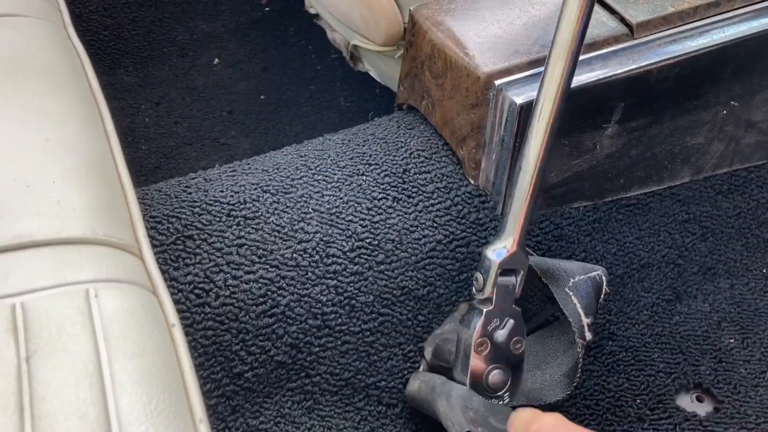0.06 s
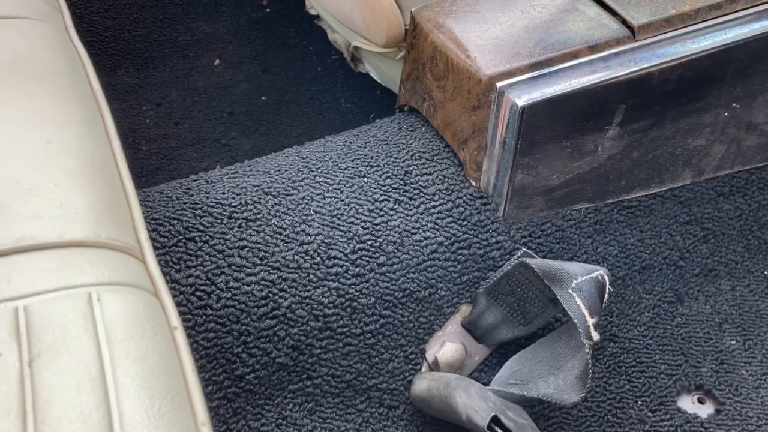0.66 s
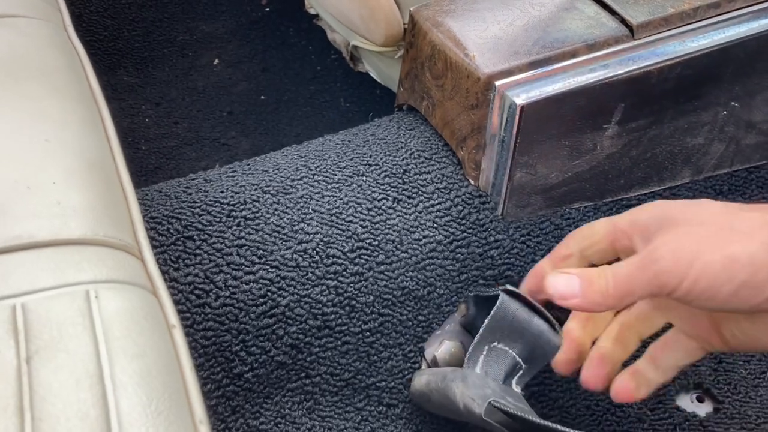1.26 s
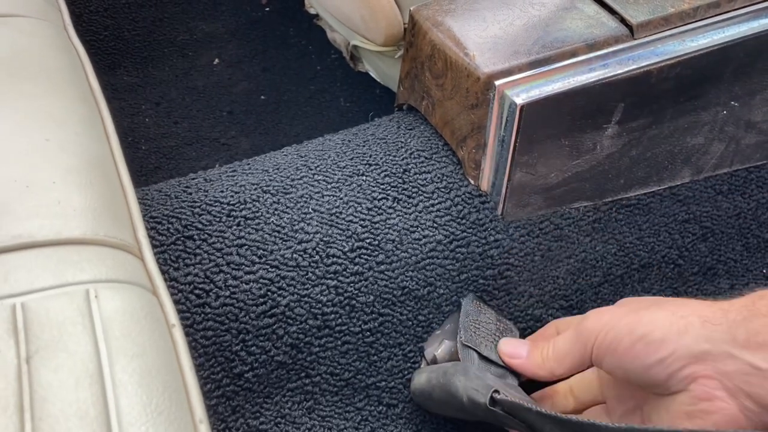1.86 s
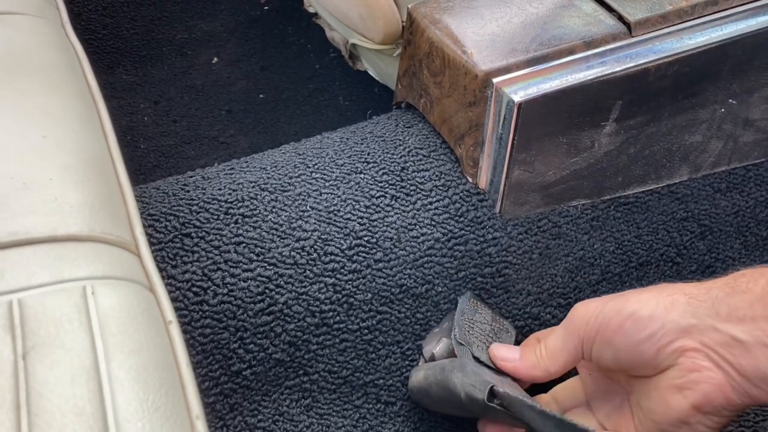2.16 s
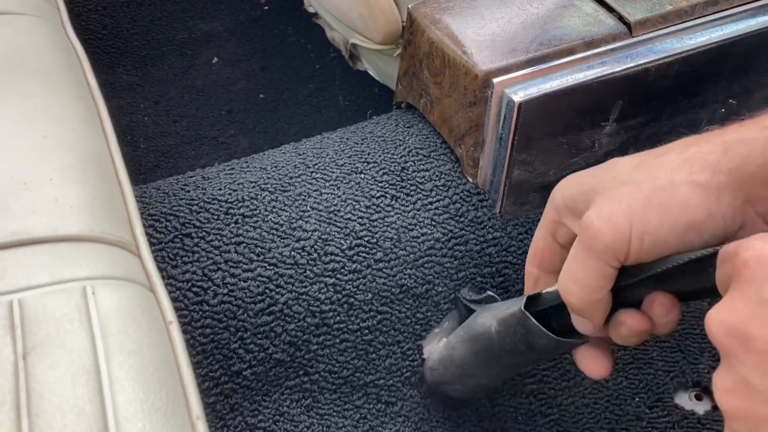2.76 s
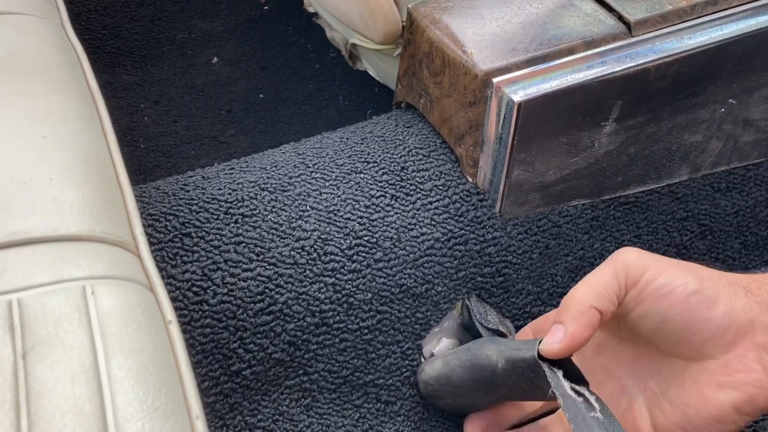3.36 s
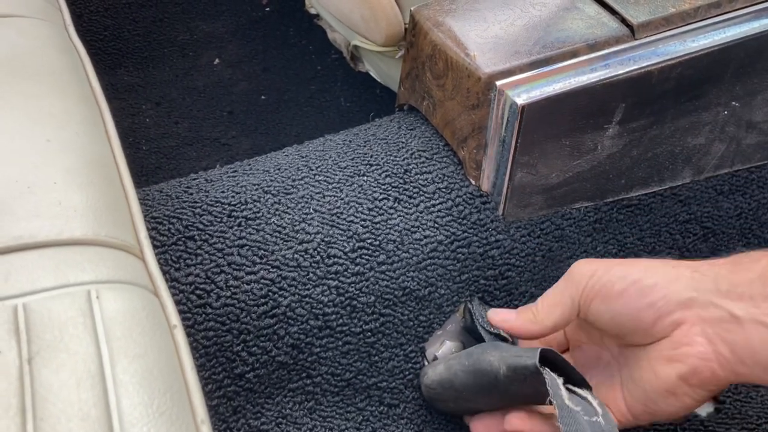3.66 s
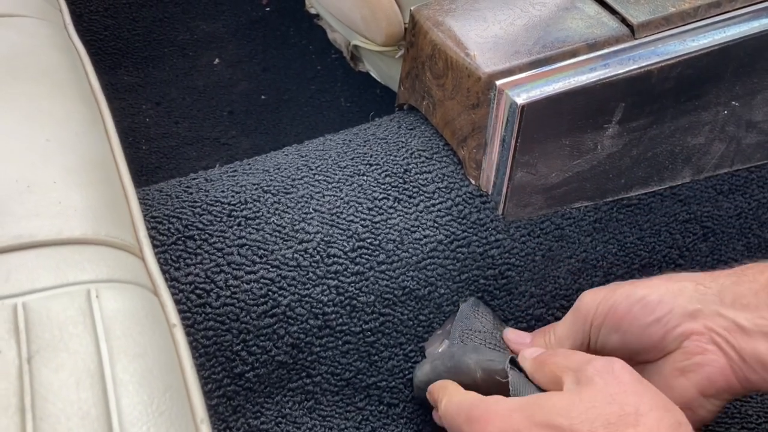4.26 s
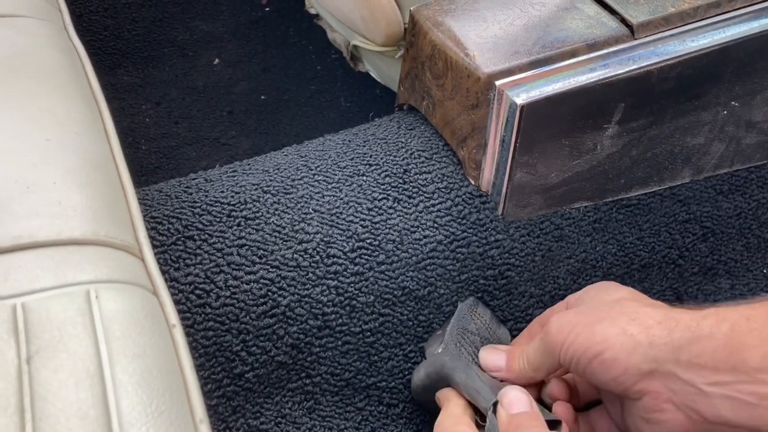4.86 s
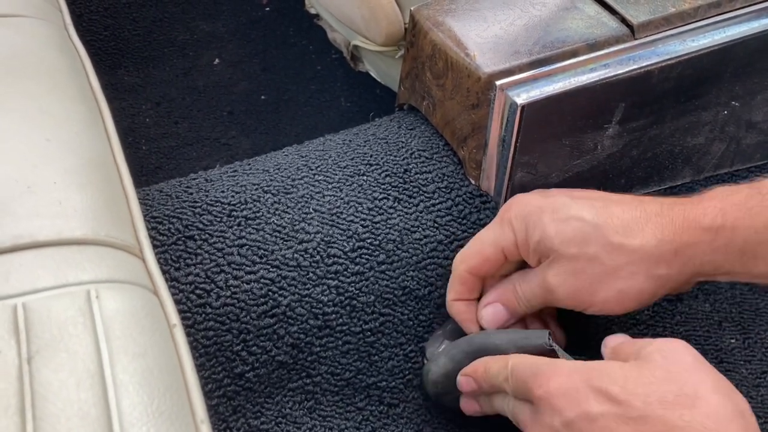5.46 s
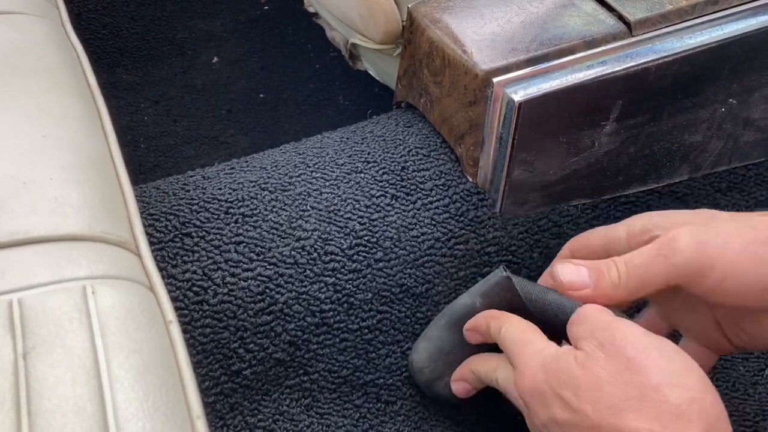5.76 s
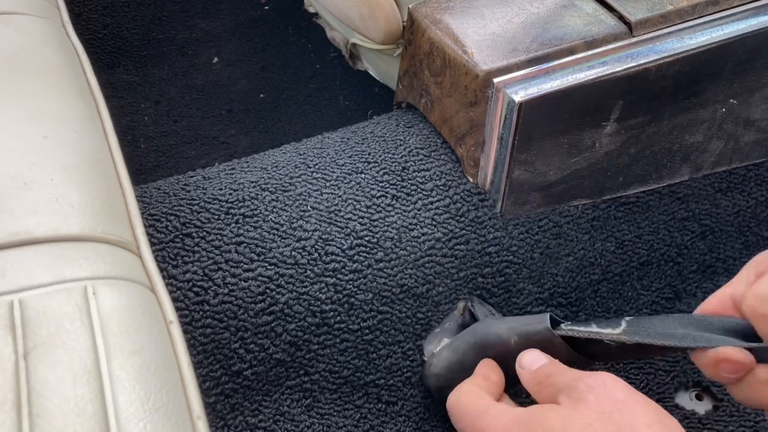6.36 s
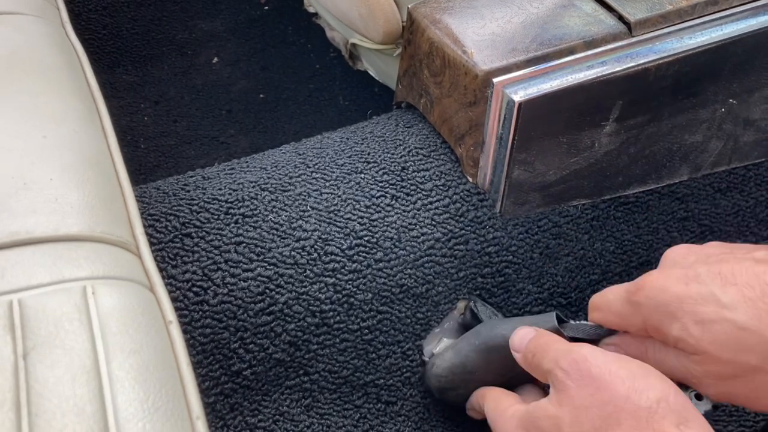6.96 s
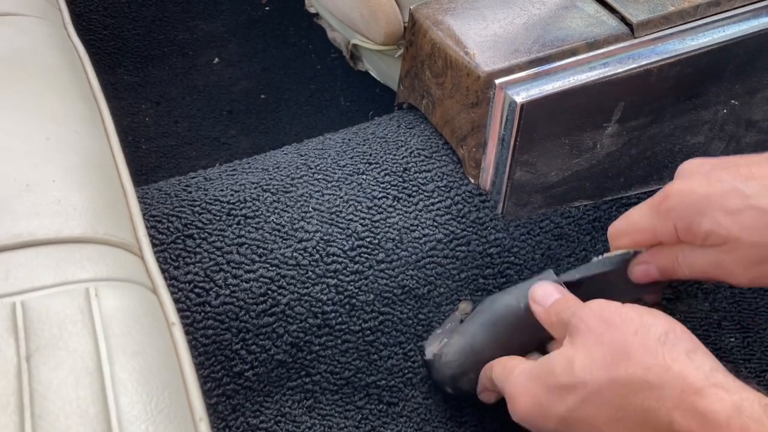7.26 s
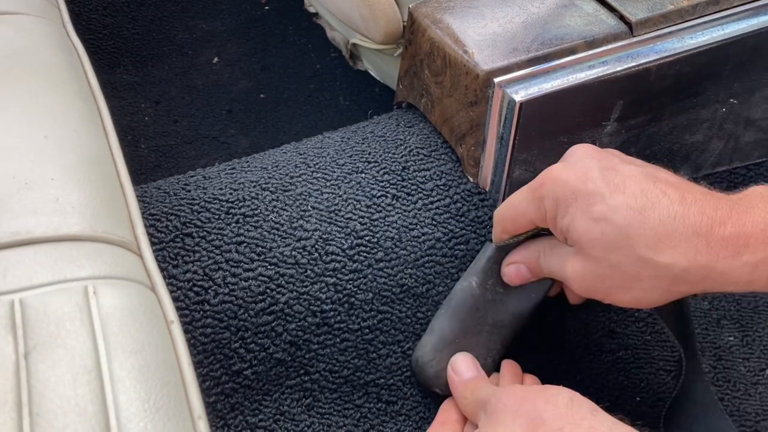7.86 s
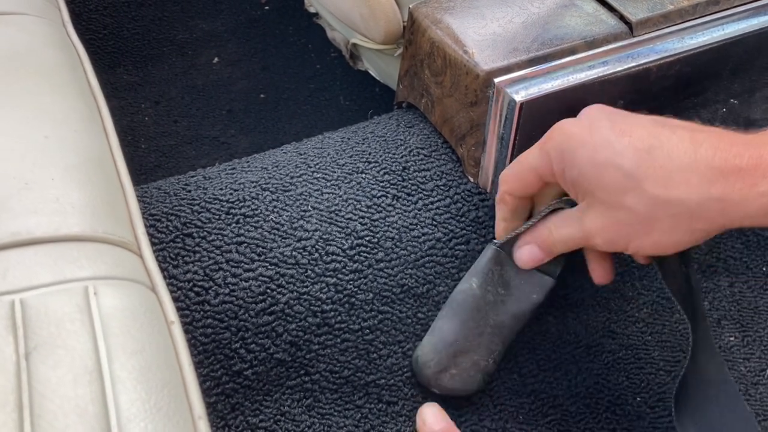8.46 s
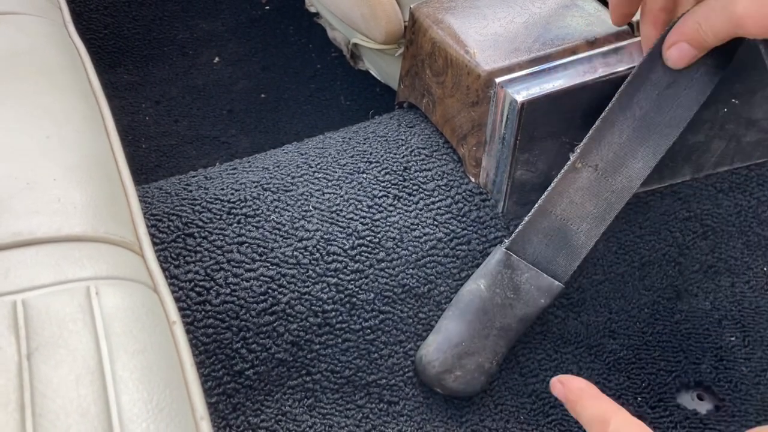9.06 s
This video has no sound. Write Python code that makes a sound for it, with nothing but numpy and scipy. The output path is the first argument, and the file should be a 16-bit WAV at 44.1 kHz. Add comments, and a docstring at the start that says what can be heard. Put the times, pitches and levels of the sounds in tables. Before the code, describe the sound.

Close up inside an open, parked car, steel rattles and knocks over a low boom from the floor, then clicks and thumps again about a second later. A long stretch of uneven scratchy rubbing follows as seat belt webbing slips through a stiff vinyl sleeve, dotted with light knocks. A louder cluster of knocks and thumps comes late, then more sliding. A soft outdoor rumble lies underneath.

```python
"""A steel seat belt anchor plate flops over and thumps the carpeted floor pan of an open, parked car
as a ratchet is lifted off its bolt. The pan booms in low modes; the steel knocks, ticks and pings.
Hands work a vinyl boot down the webbing, rubbing in grains of stick and slip, until the plate knocks
home inside it. Short cabin reflections surround it; faint outdoor air and far insects lie underneath."""
import sys
import numpy as np
from scipy import signal
from scipy.fft import rfft, irfft, next_fast_len
from scipy.io import wavfile

SR = 44100
rng = np.random.default_rng(int(sys.argv[2]) if len(sys.argv) > 2 else 0)


def digitize_waveform(pressure):
    """Quantize a signal to 16-bit integers and store it at the path in sys.argv[1].

    Rows of a 2-D input are taken as channels; values are limited to [-1, 1].
    """
    field = np.atleast_2d(pressure).T
    bounded = np.clip(field, -1, 1)
    quanta = np.round(bounded * 32767).astype(np.int16)
    wavfile.write(sys.argv[1], SR, quanta)


N = 401751
T = np.arange(N) / SR
# bright snap of metal edges and stiff vinyl: f/Hz, level/dB
SNAP_EQ = [(400, -2.5), (1200, 4.5), (4000, 2.5), (5500, -2), (8000, 11), (12000, 7.5), (16000, 5)]


def undb(db):
    """Decibels to gain."""
    return 10 ** (np.asarray(db) / 20)


def unit(x):
    """Scale to rms 1."""
    return x / np.sqrt(np.mean(x ** 2))


def add(track, s, sound, db):
    """Mix a sound in at time s with the given peak level."""
    i = max(int(s * SR), 0)
    track[i:i + len(sound)] += (undb(db) * sound / np.abs(sound).max())[:N - i]


def colour(x, points, tilt_db=0):
    """Minimum-phase EQ through (f/Hz, level/dB) points, tilted by tilt_db an octave."""
    size = next_fast_len(len(x) + 4096)
    size += size % 2
    octave = np.log2(np.maximum(np.fft.rfftfreq(size, 1 / SR), 1))
    hz, db = np.transpose(points)
    gain = undb(np.interp(octave, np.log2(hz), db + tilt_db * np.log2(hz / hz[0])))
    cepstrum = irfft(np.log(gain))
    cepstrum[1:size // 2] *= 2  # fold forward, so nothing rings ahead of an attack
    cepstrum[size // 2 + 1:] = 0
    return irfft(rfft(x, size) * np.exp(rfft(cepstrum)))[:len(x)]


def resonate(x, hz, width):
    """One resonance, gain 1 at its centre."""
    return signal.lfilter(*signal.iirpeak(hz, hz / width, fs=SR), x)


def decay(t, t60):
    """Envelope that falls 60 dB in t60 seconds."""
    return np.exp(-np.log(1000) * t / t60)


def walk(rate):
    """Random drift, gliding to a new value rate times a second."""
    return np.interp(T * rate, np.arange(N), rng.standard_normal(N))


def grains(rate, spread_db):
    """Tiny slips at random moments, a few far stronger than the rest."""
    slips = (rng.random(N) < rate / SR) * rng.standard_normal(N)
    strength_db = spread_db * np.minimum(rng.exponential(size=N), 4)
    return unit(slips * undb(strength_db))


def gestures(table, swell_share=0.28, sag_db=1.5, fade_s=0.013, fade_share=0.15):
    """One envelope per level column: each move swells, sags and fades, long ones more slowly."""
    power, t = np.zeros((len(table[0]) - 2, N)), T[:SR]
    for start, length, *levels_db in table:
        swell = np.sin(np.pi / 2 * np.minimum(t / (swell_share * length), 1))
        fade = np.exp(-np.maximum(t - length, 0) / (fade_s + fade_share * length))
        shape = swell * undb(-sag_db * np.minimum(t / length, 1)) * fade
        i = max(int(start * SR), 0)
        power[:, i:i + len(t)] += np.outer(undb(levels_db), shape[:N - i]) ** 2
    return np.sqrt(power)


def outdoors(air_db=-49, balance_db=-0.4, insect_hz=4200):
    """The bed: distant rumble in the centre, wide hiss and a thin band of insects."""
    # outdoor air: f/Hz, level/dB
    air_eq = [(20, -15), (42, 3), (70, 2), (105, 1.5), (135, -6), (200, -6), (300, -21), (600, -27),
              (1300, -33), (2000, -37.5), (4300, -52), (6000, -48.5), (12000, -62), (16000, -60)]
    # far insect calls: t/s, length/s, level/dB
    calls = [(.17, 0.26, -64.5), (.55, 0.42, -72.5)]
    mid, side = (colour(rng.standard_normal(N), air_eq) for _ in range(2))
    side = colour(side, [(80, -17.0), (200, -12.5), (600, 2.0), (2000, 4.5)])
    air = np.array([(mid + side) * undb(balance_db), (mid - side) / undb(balance_db)]) / mid.std()
    insects = resonate(rng.standard_normal((2, N)), insect_hz, width=800)
    insects = unit(resonate(insects, insect_hz, width=800))
    swell_db = 1.6 * walk(rate=3)
    return air * undb(air_db + swell_db) + insects * gestures(calls)[0]


def reflected(x):
    """Seats and console throw back the middle range; the bass bends round them."""
    # tone of the reflections: f/Hz, level/dB
    cabin_eq = [(300, -3.5), (550, 1.5), (1100, -6), (2200, -1.5), (5500, 6), (7000, -22), (16000, -51)]
    return signal.sosfilt(signal.butter(2, 230, "high", fs=SR, output="sos"), colour(x, cabin_eq))


def cabin(x, t60=0.038, gap_s=0.0012, wet_db=-2):
    """The cabin returns a short spray of reflections, different left and right."""
    t = T[:SR // 5]
    sprays = rng.standard_normal((2, len(t))) * decay(t, t60) * (t > gap_s)
    responses = [reflected(spray / np.linalg.norm(spray)) for spray in sprays]
    return undb(wet_db) * np.array([signal.fftconvolve(x, response)[:N] for response in responses])


def mic_ports(x):
    """Direct sound reaches the two mic ports nearly in step in the bass, out of step in the treble."""
    # lead of left over right: f/Hz, phase/rad
    lead = [(0, 0), (180, -.2), (300, -.8), (400, 0), (7300, -.1), (9200, -3.14), (11500, -6.28),
            (13600, -9.42), (15400, -12.5), (22050, -12.6)]
    # balance of left over right: f/Hz, level/dB
    balance = [(70, -1), (200, -4), (900, 0.5), (2200, 2.5), (4500, 0.5), (12000, -0.5)]
    hz = np.fft.rfftfreq(N, 1 / SR)
    phase = np.interp(hz, *np.transpose(lead))
    balance_db = np.interp(hz, *np.transpose(balance))
    pan = np.exp(0.5j * phase) * undb(balance_db / 2)
    return np.array([irfft(rfft(x) * pan, N), irfft(rfft(x) / pan, N)])


def hand_echo(x, lag_s):
    """A moving hand reflects some of the rubbing: a drifting comb filter."""
    return 0.9 * x + 0.45 * np.interp(T - lag_s, T, x)


def webbing(slide, press, catch_db=1.5):
    """Threads slip over the vinyl in dense grains; the belt catches unevenly and the boot crinkles."""
    # hiss of the weave: f/Hz, level/dB
    weave_eq = [(2500, -29.5), (4500, -25), (6000, -5.5), (8400, -1.5), (11500, -0.5), (14000, -7),
                (16000, -8)]
    # rasp of pressed vinyl: f/Hz, level/dB
    rasp_eq = [(900, -12.5), (1900, -2.5), (3000, -6), (4200, -2), (5500, -15), (9000, -14.5)]
    hiss = unit(colour(grains(rate=14000, spread_db=1.5), weave_eq)) * slide
    rasp = unit(colour(grains(rate=2200, spread_db=2.4), rasp_eq)) * press
    crinkle = unit(colour(grains(rate=120, spread_db=2), SNAP_EQ, tilt_db=-2)) * press * undb(-3)
    return (hiss + rasp) * undb(catch_db * walk(rate=54)) + crinkle


def scuffing(grip, jerk_db=2):
    """Coarser stick and slip scuffs the hollow boot."""
    # body of the boot: f/Hz, level/dB
    boot_eq = [(200, 8), (430, 7), (570, 0.5), (780, 7.5), (1000, 6.5), (1400, 9), (1800, -5.5),
               (3500, -37.5)]
    scuff = unit(colour(grains(rate=2000, spread_db=3.0), boot_eq))
    return scuff * grip * undb(jerk_db * walk(rate=45))


def scrapes(width_share=0.42):
    """Each rub swells and fades in a broad resonance set by how the boot is held."""
    # rubs on the squeezed boot: middle t/s, spread/s, resonance f/Hz, level/dB
    rubs = [(2.74, 0.039, 1920, -67), (2.91, .027, 1800, -67.5), (3.72, 0.02, 950, -54),
            (3.785, 0.019, 1000, -54), (3.915, 0.024, 2300, -53), (4.04, .036, 4000, -62),
            (4.53, 0.022, 1160, -55), (4.83, 0.045, 2360, -62.5), (4.84, 0.026, 830, -78),
            (5.049, 0.016, 627, -57), (5.22, 0.017, 1000, -57.5), (5.338, 0.0058, 2120, -59),
            (6.49, 0.02, 2070, -64), (6.5, .017, 1280, -56.5), (7.78, 0.08, 925, -61),
            (8.54, 0.054, 4100, -56.5)]
    out, slips = np.zeros(N), grains(rate=1100, spread_db=2.4)
    for s, spread_s, hz, db in rubs:
        near = np.abs(T - s) < 4 * spread_s
        hollow = resonate(resonate(slips[near], hz, width_share * hz), hz, width_share * hz)
        swell = np.exp(-0.5 * ((T[near] - s) / spread_s) ** 2)
        out[near] += unit(hollow) * swell * undb(db)
    return out


def rubbing(resting_db=(-74.5, -78.5, -73)):
    """Hands rub all along the belt, so the direct sound and both reflections get their own grains."""
    # hand strokes: t/s, length/s, weave hiss level/dB, vinyl rasp level/dB, boot scuff level/dB
    strokes = [(0.026, 0.021, -53, -53.5, -35), (0.078, 0.036, -65.0, -50.5, -36.5),
               (0.494, 0.081, -59.5, -61.5, -57), (0.6, 0.26, -67.5, -72.5, -91),
               (0.85, 0.35, -55.5, -60.0, -58.5), (1.04, 0.04, -52.5, -48.0, -44.5),
               (1.063, 0.19, -54.5, -56.5, -59.5), (1.288, 0.17, -54.5, -58, -50),
               (1.473, 0.18, -60, -66.5, -59), (1.674, 0.057, -61, -74, -62),
               (1.991, 0.27, -69.5, -82, -80), (2.225, 0.093, -59.5, -66.5, -59),
               (2.38, 0.19, -63.5, -70.5, -57), (2.659, 0.106, -63.5, -67.5, -55),
               (2.726, 0.12, -61.5, -69.5, -103.5), (2.86, 0.11, -54.5, -65, -66),
               (3.033, 0.09, -56.5, -63, -54.5), (3.171, 0.18, -59.5, -64.5, -62),
               (3.519, 0.028, -64.0, -58.5, -56), (3.751, 0.15, -62, -63.5, -57),
               (3.892, 0.045, -46.5, -52.5, -49), (3.924, 0.25, -59.0, -66, -60),
               (4.185, 0.165, -66.5, -67.5, -59), (4.481, 0.16, -61, -65, -57.5),
               (4.759, 0.12, -64.5, -66, -56.5), (5.011, 0.033, -59.0, -65.5, -60),
               (5.18, 0.044, -59.5, -61.0, -55), (5.255, 0.088, -64.0, -67, -58.5),
               (5.38, 0.041, -59, -60, -51), (5.538, 0.15, -58, -64.5, -60.5),
               (5.785, 0.2, -63.5, -83, -62.0), (5.873, 0.075, -68, -63.5, -51),
               (5.925, 0.077, -52, -59.5, -50.5), (6.063, 0.16, -58, -67.0, -69),
               (6.196, 0.17, -57, -60.0, -59), (6.271, 0.039, -49, -47.5, -51.5),
               (6.432, 0.13, -57.5, -71, -58), (6.509, 0.059, -51.5, -64, -68),
               (6.622, 0.039, -57, -69, -75), (6.828, 0.15, -59.5, -65, -64), (6.915, 0.041, -67, -60, -51),
               (7.002, 0.19, -70.5, -75.5, -66.5), (7.205, 0.12, -52.5, -56, -48.5),
               (7.329, 0.13, -63.0, -70, -58.5), (7.533, 0.11, -57.5, -70.5, -62),
               (7.669, 0.1, -60.5, -69, -67.0), (7.834, 0.25, -64, -70, -60),
               (8.144, 0.133, -64, -68.5, -58.5), (8.36, 0.16, -64, -68.5, -61.5),
               (8.425, 0.18, -49.5, -63, -59.5), (8.57, 0.31, -56.0, -60.5, -59),
               (8.955, 0.051, -64.0, -71, -54.5)]
    # resting hands keep all three layers faintly alive between strokes
    slide, press, grip = np.hypot(gestures(strokes), undb(resting_db)[:, None])
    lag_s = 0.0003 + 0.00015 * np.abs(walk(rate=8))
    direct, left, right = (hand_echo(webbing(slide, press) + scuffing(grip), lag_s) + scrapes()
                           for _ in range(3))
    return direct, np.array([reflected(left), reflected(right)])


def pings(detune=0.011, rise_s=0.0006):
    """Nearly round steel parts ring in close pairs of modes that beat as they fade."""
    # thin rings of small steel parts: t/s, level/dB, f/Hz, t60/s
    rings = [(.031, -38, 2250, .05), (.036, -41, 3150, .04), (.097, -50, 11980, .35),
             (.864, -42, 4150, .035), (.864, -46, 5000, .03), (.878, -47, 11980, .4),
             (.944, -51, 11980, .35), (1.064, -56, 11980, .25)]
    out, t = np.zeros(N), T[:SR // 2]
    for s, db, hz, t60 in rings:
        pair = np.sin(2 * np.pi * hz * t) + 0.8 * np.sin(2 * np.pi * hz * (1 + detune) * t)
        add(out, s, pair * decay(t, t60) * (1 - np.exp(-t / rise_s)), db)
    return out


def ticks(rise_s=0.00035, snap_s=0.00043, tail_s=0.005, tail_db=-20):
    """Metal edges and stiff vinyl snap for about a millisecond, with a faint, damped tail."""
    # sharp contacts: t/s, level/dB, brightness f/Hz
    snaps = [(0.035, -26, 5600), (.863, -26.5, 4500), (.8768, -22, 8200), (0.9432, -24.5, 10900),
             (1.204, -22, 6440), (1.231, -18.5, 8440), (1.432, -26, 2940), (2.402, -32.5, 6000),
             (2.546, -45, 3000), (2.611, -44.5, 3500), (3.348, -31.5, 3700), (3.533, -26.5, 3680),
             (3.832, -40.5, 4500), (4.029, -41, 3000), (4.219, -35, 3850), (4.285, -42.5, 4940),
             (4.3408, -31, 5500), (4.802, -36, 3520), (5.232, -41.5, 4500), (5.404, -36.5, 3940),
             (5.43, -36.5, 5700), (6.011, -35, 5000), (6.101, -33.5, 7200), (6.231, -27.5, 9900),
             (6.236, -37, 7000), (6.268, -33, 5960), (6.929, -31, 3020), (7.175, -37, 3520),
             (7.203, -33.5, 9000), (7.2278, -24.5, 4300), (7.262, -23.5, 3670), (7.286, -22, 4470),
             (7.309, -32, 3500), (8.21, -43.5, 5100), (8.22, -40, 5000), (8.242, -33.5, 4400),
             (8.25, -36, 4000), (8.26, -27.5, 4200)]
    out, t = np.zeros(N), T[:SR // 16]
    shape = (1 - np.exp(-t / rise_s)) * (np.exp(-t / snap_s) + undb(tail_db) * np.exp(-t / tail_s))
    for s, db, bright_hz in snaps:
        tilt_db = 4 * np.log2(bright_hz / 7000)
        add(out, s, colour(rng.standard_normal(len(t)) * shape, SNAP_EQ, tilt_db), db)
    return out


def knocks(trim_db=-1, chatter_db=-21, width_share=0.3, muffle_hz=6000):
    """The plate hits its bolt and chatters; harder contact wakes higher modes, the boot dulls the top."""
    # plate on bolt: t/s, level/dB, contact f/Hz, chatter t60/s
    hits = [(0.029, -42, 1000, 0.063), (.038, -24.5, 564, 0.051), (.053, -21, 600, 0.038),
            (.065, -24, 480, 0.098), (0.087, -29.5, 450, 0.039), (0.103, -24.5, 516, 0.045),
            (.116, -25.5, 570, 0.059), (1.207, -35, 640, 0.012), (1.233, -44, 630, 0.014),
            (1.43, -32, 600, 0.068), (2.402, -37.5, 600, 0.039), (2.546, -41, 537, 0.015),
            (2.613, -36.5, 540, 0.023), (3.352, -42, 670, 0.026), (3.533, -41, 1190, 0.066),
            (3.908, -35.5, 607, 0.075), (3.931, -36, 1040, 0.095), (4.549, -35, 1200, 0.04),
            (4.803, -36.5, 724, 0.052), (5.25, -47, 700, 0.035), (5.403, -39, 584, 0.025),
            (5.863, -38.5, 490, 0.019), (5.913, -37, 810, 0.03), (6.93, -33, 1190, 0.02),
            (7.148, -41, 870, 0.023), (7.169, -39, 750, 0.098), (7.229, -31, 715, 0.054),
            (7.262, -24, 627, 0.047), (7.285, -24, 780, .04), (7.294, -20.5, 870, 0.07),
            (7.3085, -12.5, 940, 0.0072), (8.976, -33, 560, 0.044)]
    # modes of the plate in its boot: f/Hz, width/Hz, level/dB
    modes = [(431, 59, 9.5), (507, 31, 4.5), (780, 130, 2), (930, 420, 3), (1319, 104, 10), (1430, 71, -30),
             (2210, 250, -33), (3240, 580, -2.5)]
    out, t = np.zeros(N), T[:SR // 5]
    for s, db, contact_hz, t60 in hits:
        chatter = undb(chatter_db) * rng.standard_normal(len(t)) * decay(t, t60)
        force = resonate((t == 0) + chatter, contact_hz, width_share * contact_hz)
        ring = sum(undb(mode_db) * resonate(force, hz, width) for hz, width, mode_db in modes)
        add(out, s, ring, db + trim_db)
    return signal.sosfilt(signal.butter(2, muffle_hz, fs=SR, output="sos"), out)


def floor_pan(force):
    """The carpeted steel floor booms in a few damped modes."""
    # floor modes: f/Hz, level/dB before weighting by decay time, t60/s
    modes = [(74.2, -2, 0.43), (105.5, 2, 0.076), (121, -5.5, 0.14), (158.1, 2.5, 0.093),
             (193.4, 0.5, 0.12), (233.8, 1, 0.22), (313, -6, 0.12), (364, -17, 0.21), (437.5, -7.5, 0.25)]
    return sum(undb(db) * t60 * resonate(force, hz, np.log(1000) / (np.pi * t60))
               for hz, db, t60 in modes)


def drag_rumble():
    """The dragged plate keeps the floor pan shaking."""
    # drags over the carpet: t/s, length/s, level/dB
    drags = [(.03, 0.1, -21.5), (.86, 0.57, -36), (1.04, 0.39, -34.5), (2.22, 0.58, -40),
             (2.53, 0.21, -41.5), (2.9, 0.42, -49.5), (3.35, 0.051, -34.5), (3.79, 0.17, -42.5),
             (4.13, 0.13, -43), (4.52, 0.084, -39.5), (4.77, 0.074, -44), (5.17, 0.097, -38),
             (5.41, 0.078, -42), (5.88, 0.15, -35.5), (6.29, 0.035, -37.5), (6.42, 0.17, -47.5),
             (6.85, 0.15, -42), (7.21, .15, -27.5), (7.77, .09, -45.5), (8.06, 0.047, -42),
             (8.47, 0.086, -45.5), (9.06, 0.043, -41.5)]
    force = colour(rng.standard_normal(N), [(40, -10.5), (70, -3.5), (110, 9), (200, -0.5), (400, -23.5)])
    return unit(floor_pan(force)) * gestures(drags)[0]


def thumps(bounce_q=4.0):
    """Each blow is a damped bounce on the carpet that wakes the floor modes near its rate."""
    # blows on the floor pan: t/s, level/dB, bounce f/Hz
    blows = [(0.046, -18, 158), (0.0534, -10.5, 170), (0.0781, -19.5, 204), (0.1, -13.5, 153),
             (0.126, -16, 127), (0.873, -16.5, 181.5), (0.892, -13, 111), (1.0621, -5, 228),
             (1.072, -2, 182), (1.109, -15, 130), (1.183, -26, 107), (1.236, -29, 126), (1.291, -25.5, 106),
             (1.368, -28, 147.3), (1.428, -21, 138), (1.448, -18.5, 139), (2.41, -32, 117),
             (2.558, -19, 167), (2.62, -33.5, 228), (2.713, -28, 143), (2.757, -28, 147),
             (3.355, -28.5, 116), (3.549, -27, 124), (3.805, -25.5, 117), (3.93, -27.5, 123),
             (4.563, -34, 119), (5.238, -32, 102), (5.422, -35, 121), (5.912, -38, 127), (5.99, -40, 110),
             (6.3, -32.5, 121), (6.982, -29.5, 192), (7.192, -23, 189), (7.239, -19, 220),
             (7.254, -15.5, 200), (7.28, -11, 180), (7.303, -9, 173), (7.3221, -14.5, 185),
             (8.079, -33, 107), (8.261, -42, 260)]
    out, t = np.zeros(N), T[:SR // 2]
    for s, db, bounce_hz in blows:
        phase = 2 * np.pi * bounce_hz * t
        force = np.sin(phase) * np.exp(-phase / (2 * bounce_q))
        add(out, s, floor_pan(force), db)
    return out


def scene():
    """Close handling and its cabin reflections over the outdoor bed, in stereo."""
    floor = thumps() + drag_rumble()
    contacts = knocks() + ticks() + pings()
    direct_rub, diffuse_rub = rubbing()
    close = mic_ports(floor + contacts + direct_rub)
    return close + cabin(contacts + floor) + undb(-1) * diffuse_rub + outdoors()


def record(dry, low_cut_hz=38, high_cut_hz=15900):
    """Roll off the deepest bass and cut the very top steeply."""
    dry = signal.sosfilt(signal.butter(4, low_cut_hz, "high", fs=SR, output="sos"), dry)
    return signal.sosfilt(signal.ellip(8, 0.2, 70, high_cut_hz, fs=SR, output="sos"), dry)


dry = scene()
out = record(dry)
digitize_waveform(out)
```